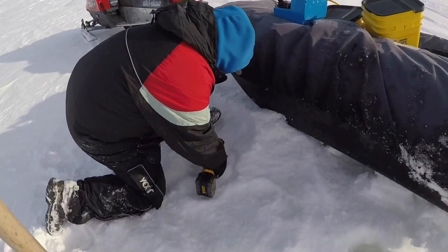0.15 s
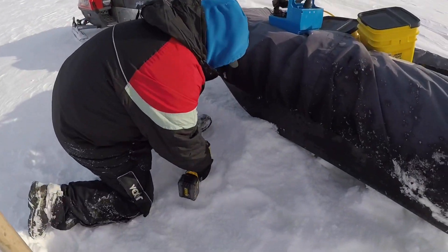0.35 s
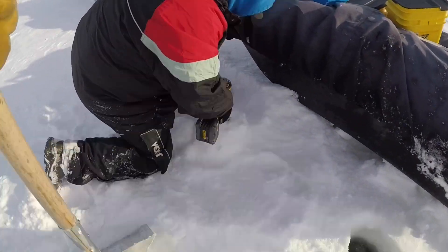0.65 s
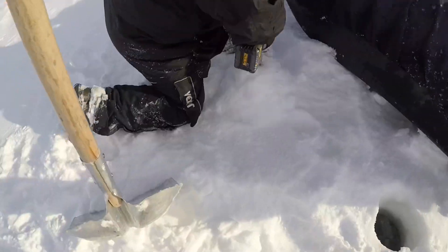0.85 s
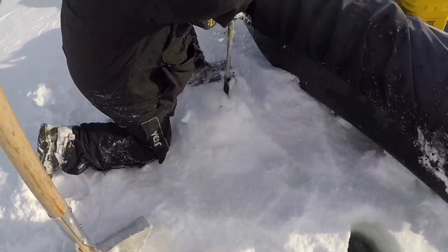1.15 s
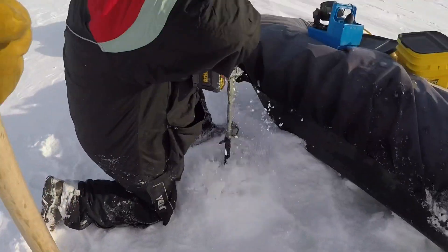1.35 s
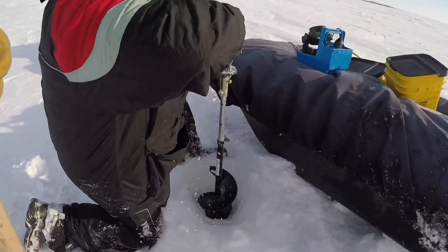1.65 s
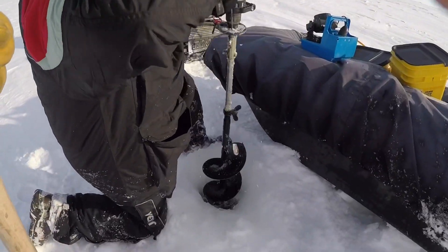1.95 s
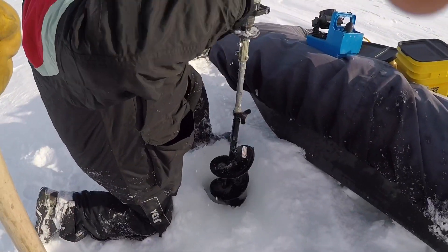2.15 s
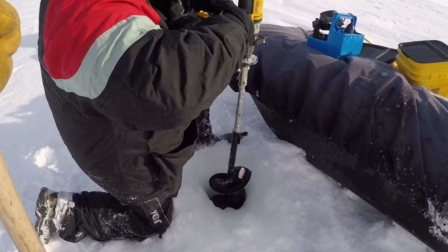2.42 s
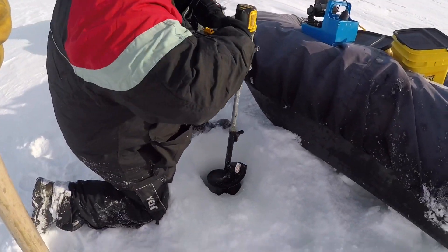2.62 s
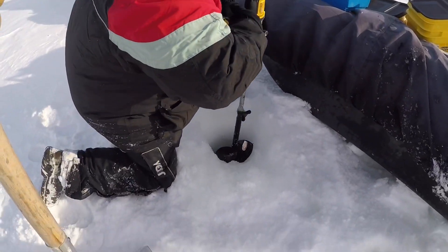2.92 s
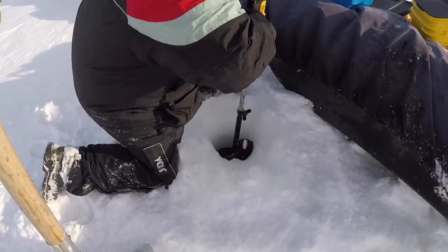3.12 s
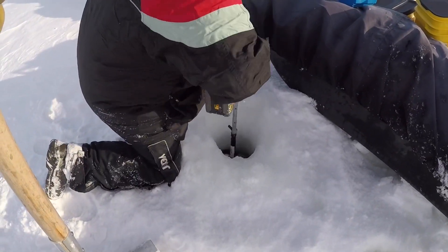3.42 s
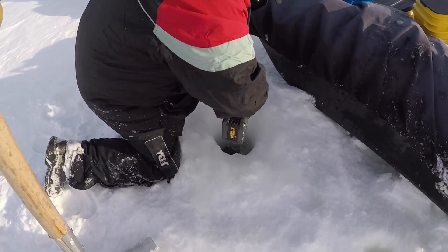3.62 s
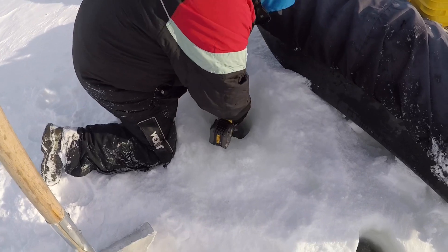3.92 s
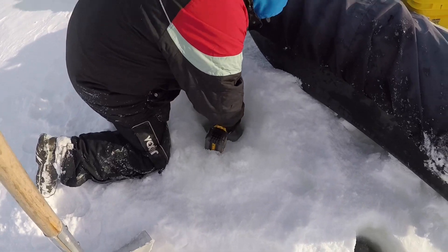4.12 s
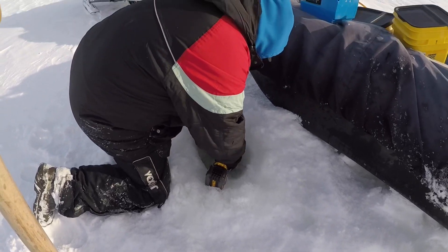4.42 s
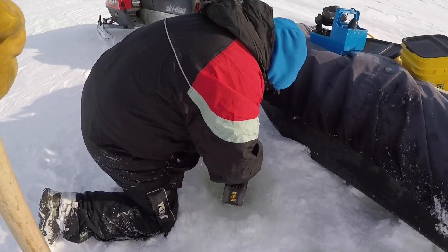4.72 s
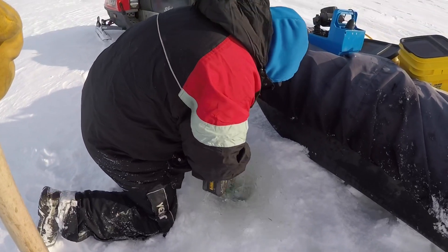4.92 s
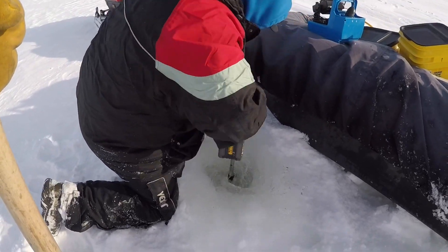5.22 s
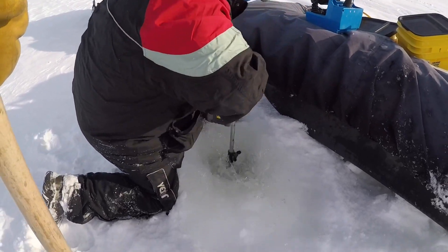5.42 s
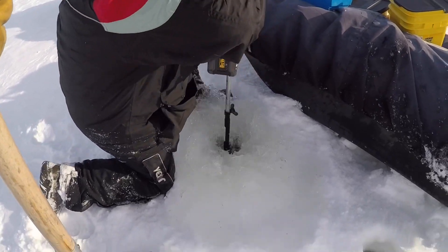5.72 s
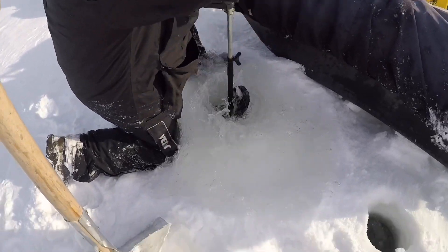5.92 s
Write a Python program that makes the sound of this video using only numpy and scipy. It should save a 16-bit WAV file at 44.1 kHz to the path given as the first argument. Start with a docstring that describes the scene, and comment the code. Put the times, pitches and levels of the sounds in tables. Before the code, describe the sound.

Wind thumps and rumbles on a small camera microphone out on lake ice. A cordless drill whines twice, spinning an auger, then rests while ice scrapes, snow crunches and the trigger clicks. The motor starts again for its longest run, with low glugs of slush in the hole, and finishes with three short, hissy spurts over wet churning and grinding.

```python
"""A cordless drill spins an ice auger in six bursts, out on a windy frozen lake.
The motor whines on its shaft orders over a hiss of cooling air and scraped ice. Slush glugs in the
hole; snow crunches and the trigger clicks, mostly between the bursts. Heard through the microphone
of a small camera, with the wind buffeting it."""
import sys
import numpy as np
from scipy import signal
from scipy.fft import rfft, irfft, next_fast_len
from scipy.io import wavfile
from scipy.ndimage import uniform_filter1d, map_coordinates

SR = 44100
rng = np.random.default_rng(int(sys.argv[2]) if len(sys.argv) > 2 else 0)


def wrap_up_sound(samples):
    """Save the sound to the file named by the first command line argument, as 16-bit audio."""
    columns = np.atleast_2d(samples).T
    # keep every value between -1 and 1, then stretch to whole-number steps
    tamed = np.clip(columns, -1, 1)
    steps = np.round(tamed * 32767).astype(np.int16)
    wavfile.write(sys.argv[1], SR, steps)


N = 267157
STEP = 32  # samples between control values

# bright hiss of air, ice and snow: (frequency [Hz], spectral level [dB])
HISS_SPECTRUM = [(1180, 0.5), (2000, -4), (2730, -5), (3080, 1.5), (3400, -2.5), (4170, 6.5), (5600, 3),
                 (6250, 1), (7400, -11.5), (8540, -10.5), (13200, -38.5), (14000, -49), (15000, -92)]
# dull grind of ice and snow: (frequency [Hz], spectral level [dB])
GRIND_SPECTRUM = [(300, 0.5), (700, 2.5), (1200, -6), (2000, -12), (2700, -15.5), (3600, -48)]


def amp(db):
    return 10 ** (np.asarray(db) / 20)


def unit(x):
    return x / np.sqrt(np.mean(x ** 2) + 1e-20)


def curves(rows):
    """One value per sample for each column after the time."""
    times, *columns = np.transpose(rows)
    return [np.interp(np.arange(N) / SR, times, column) for column in columns]


def per_sample(control):
    """Control values spread out to one value per sample."""
    return np.interp(np.arange(N), np.arange(len(control)) * STEP, control)


def swells(rows):
    """One rounded rise and fall in control values for each row of (middle [s], length [s])."""
    t = np.arange(0, N, STEP) / SR
    spans = np.array([(t - middle) / length for middle, length, *_ in rows])
    return (.83 * np.cos(np.pi * np.clip(spans, -.5, .5))) ** 2


def wobble(rate):
    """A smooth random curve of rms 1, rate knots a second."""
    knots = rng.standard_normal(int(N * rate / SR) + 4)
    return unit(map_coordinates(knots, [np.arange(N) * rate / SR]))


def filtered(x, response):
    """x shaped by a gain that depends on frequency."""
    size = next_fast_len(N + 8192)
    return irfft(rfft(x, size) * response(np.fft.rfftfreq(size, 1 / SR)), size)[..., :N]


def noise(spectrum, patchy_db):
    """Coloured noise of rms 1 with patches of random gain in time and frequency."""
    cells = signal.stft(rng.standard_normal(N), nperseg=512)[2]
    patches = uniform_filter1d(rng.standard_normal(cells.shape), size=5, axis=0)
    patches = uniform_filter1d(patches, size=6, axis=1)
    patchy = signal.istft(cells * amp(patchy_db * unit(patches)), nperseg=512)[1][:N]
    knots_hz, db = np.transpose(spectrum)
    return unit(filtered(patchy, lambda hz: amp(np.interp(np.log(hz + 1), np.log(knots_hz + 1), db))))


def fuzzy_tone(phase, width_hz, steady):
    """A tone of rms 1 whose strength and phase partly wander at random."""
    return unit((steady + wobble(width_hz)) * np.cos(phase) + wobble(width_hz) * np.sin(phase))


def wind():
    """Eddies hit the microphone port in lumps; the hardest are single buffets."""
    # wind on the microphone: (time [s], level [dB])
    gusts = [(0, -18), (.28, -24), (.5, -23.5), (.8, -17.5), (1.2, -21.5), (1.42, -23), (1.7, -21.5),
             (1.95, -23), (2.3, -19), (2.8, -19.5), (3.2, -21.5), (3.7, -24), (4.03, -18), (4.4, -23.5),
             (4.6, -18), (4.82, -27), (5.05, -18), (5.35, -19), (5.6, -17), (6.06, -20.5)]
    # hard eddies: (middle [s], length [s], level [dB])
    eddies = [(0.016, 0.13, -11), (0.104, 0.034, -11), (0.144, 0.023, -9), (0.211, 0.09, -10),
              (.575, 0.048, -11.5), (0.736, 0.17, -18), (0.938, 0.15, -13), (1.072, 0.16, -14),
              (1.178, 0.06, -17), (1.53, 0.16, -18), (1.745, 0.052, -10), (1.828, .1, -19),
              (2.276, 0.12, -20), (2.74, 0.084, -26), (3.084, 0.11, -18), (3.93, 0.17, -17),
              (4.095, .12, -19.5), (4.261, 0.066, -16), (4.62, 0.076, -21), (4.933, 0.094, -18),
              (5.173, 0.075, -20), (5.41, 0.15, -14), (5.71, 0.11, -16), (5.95, 0.051, -17)]
    # rumble at the port: (frequency [Hz], spectral level [dB])
    rumble = [(15, -26), (30, 0.5), (60, 0), (110, -3), (200, -10.5), (500, -32.5), (1200, -68.5)]
    buffets = per_sample((swells(eddies) * amp(np.transpose(eddies)[2, :, None])).sum(0))
    flutter = amp(1.36 * wobble(7.1) + 1.4 * wobble(30))
    return (amp(curves(gusts)[0]) + buffets) * unit(flutter * noise(rumble, patchy_db=.5))


def crunches_and_clicks():
    """Each crunch or trigger click is a crackle over a duller thud, with a brief ring of steel."""
    # crunches of snow and ice, and clicks of the drill's trigger:
    # (time [s], level [dB], thud offset [dB], t60 [s])
    hits = [(.958, -25, -7, 0.046), (1.012, -27, -8, 0.036), (1.073, -14, -13, 0.045),
            (1.092, -10, -12, 0.046), (1.11, -14, -13, 0.076), (1.513, -11, 12.5, 0.034),
            (1.6327, -21.5, 8.5, 0.16), (1.7055, -18.5, -3, 0.089), (1.7174, -38, 13, 0.028),
            (1.8906, -19, -11, 0.048), (2.0882, -18, -16, 0.082), (2.286, -14, -2, 0.067),
            (2.405, -7.5, 12, 0.028), (2.457, -15, -4, 0.15), (2.5216, -7.5, -7, 0.037),
            (2.616, -3, -3, 0.035), (2.713, -12, -19, 0.055), (2.7427, -11, -15, 0.054),
            (2.7644, -38, 0, 0.032), (2.879, -21, 2, 0.044), (2.9407, -13, -11, 0.052),
            (2.9824, -42, 0, 0.066), (3.099, -19, -9, 0.032), (3.272, -18, 10.5, 0.051),
            (3.5654, -2, -17, 0.032), (4.884, -11, -8, 0.049), (4.9177, -27, 7, 0.035),
            (4.966, -17, 3, 0.094), (5.037, -11, -5, .03), (5.5994, -21, 3, 0.034), (5.7364, -27, 2, 0.055)]
    # modes of the auger's steel flight: (frequency [Hz], level [dB], t60 [s])
    steel_modes = [(853, 6.5, 0.034), (1166, -4, 0.045), (1710, 3, 0.029), (2300, -14, .025),
                   (3730, -3, 0.01), (4500, 7, 0.013), (5600, -21, .015), (7000, -11, 0.024)]
    t = np.arange(SR // 4) / SR
    crackle_gain, thud_gain, steel = np.zeros((3, N + SR))
    for start, db, thud_db, t60 in hits:
        at = slice(round(start * SR), round(start * SR) + len(t))
        envelope = amp(db - 60 * t / t60) * (1 - np.exp(-t / .0012))
        crackle_gain[at] += envelope
        thud_gain[at] += envelope * amp(thud_db)
        ring = sum(amp(db + level + rng.normal(0, 3.4) - 60 * t / ring_t60) * np.sin(2 * np.pi * hz * t)
                   for hz, level, ring_t60 in steel_modes)
        steel[at] += (1 - np.exp(-t / .0018)) * ring
    crackle = crackle_gain[:N] * noise(HISS_SPECTRUM, patchy_db=7.5)
    crackle = filtered(crackle, lambda hz: 1 / (1 + (hz / 9500) ** 6))
    thud = thud_gain[:N] * noise(GRIND_SPECTRUM, patchy_db=-9.5)
    return amp(-12.5) * crackle + amp(-9) * thud + amp(-16.5) * steel[:N]


def heave():
    """Slush heaves in the hole, setting the strength of the churning and the hole's note in Hz."""
    # surges of slush: (middle [s], length [s], level [dB], hole note [Hz])
    surges = [(0, 0.14, -9.5, 199), (0.184, 0.18, -12.5, 200), (0.572, 0.095, -16.5, 236),
              (0.742, 0.25, -15, 235), (0.96, 0.36, -22.5, 217), (1.091, 0.32, -25, 193),
              (1.392, 0.44, -14, 329), (1.576, 0.17, -13, 366), (1.705, 0.19, -14.5, 355),
              (1.812, 0.13, -18.5, 221), (2.19, 0.5, -22, 196), (2.605, 0.28, -28, 217),
              (2.764, 0.18, -21.5, 228), (2.955, 0.15, -19, 285), (3.132, 0.31, -18.5, 222),
              (3.473, 0.35, -11.5, 245), (3.595, 0.14, -12, 195), (3.73, 0.24, -12, 218.5),
              (3.907, 0.33, -21, 240), (4.38, 0.57, -26, 214), (5.011, 0.15, -20, 325),
              (5.183, 0.66, -22, 300), (5.44, 0.15, -15, 248), (5.552, 0.27, -14, 378),
              (5.696, 0.21, -10, 324), (5.828, 0.27, -9.5, 279), (5.987, 0.31, -12, 346)]
    rest_gain, rest_hz = amp(-42.5), 179.8
    _, _, db, hz = np.transpose(surges)[:, :, None]
    gains = swells(surges) * amp(db)
    strength = gains.sum(0) + rest_gain
    hole_hz = ((gains * hz).sum(0) + rest_gain * rest_hz) / strength
    return per_sample(strength), per_sample(hole_hz)


def slush(count=3000):
    """Lumps of slush set the air in the hole ringing for a few cycles, mostly above its note."""
    strength, hole_hz = heave()
    starts, age = (rng.random(count) * N).astype(int), np.arange(SR // 30)
    pitch, size = rng.exponential(size=(2, count))
    lump_hz = hole_hz[starts] * np.exp(np.minimum(.4 * pitch, 1.1) - .15)
    cycles = lump_hz[:, None] * age / SR
    envelope = np.exp(-cycles / 2.12) * (1 - np.exp(-cycles / 1.07)) * np.cos(np.pi / 2 * age / len(age))
    lumps = amp(2.3 * size - .7 * pitch)[:, None] * envelope * np.sin(2 * np.pi * cycles)
    churn = np.bincount((starts[:, None] + age).ravel(), lumps.ravel(), N + SR)[:N]
    return strength * unit(amp(2 * wobble(22)) * churn)


def glugs(t60_s=.057):
    """The largest lumps glug: the pitch rises as the air pocket shrinks."""
    # air pockets: (time [s], level [dB], starting pitch [Hz])
    pockets = [(.133, -7, 144), (0.217, 3, 178), (0.561, -17, 280), (.716, -2, 241), (0.771, 7, 151),
               (0.95, 0.5, 230), (1.333, -5, 342), (1.379, 4, 330), (1.414, 6.5, 311), (1.444, 5.5, 335),
               (1.525, -5, 201), (1.544, 1, 440), (1.636, 5, 349), (1.715, 0, 427), (1.818, -1, 220),
               (2.129, -10, 152), (2.983, -3.5, 181), (3.177, 0.5, 184), (3.275, 1, 232), (3.395, 6.5, 226),
               (3.561, 9.5, 173.5), (3.685, 8.5, 190), (3.746, 7, 201), (3.863, 0, 243), (3.904, 2, 277.4),
               (4.995, -3.5, 501), (5.231, -3.5, 427), (5.351, -2.5, 254), (5.407, -3.5, 368),
               (5.666, 3.5, 290), (5.701, 2, 468), (5.794, 5, 294), (5.86, -9, 316), (5.924, 0, 274)]
    # modes of the air in the hole: (pitch ratio, level [dB])
    hole_modes = [(0.999, -1), (1.7, -6), (2.4, -12.5), (3.2, -14)]
    out, t = np.zeros(N + SR), np.arange(SR // 4) / SR
    for start, db, hz in pockets:
        envelope = amp(db - 60 * t / t60_s) * (1 - np.exp(-t / .006))
        phase = 2 * np.pi * hz * t * (1 + 1.44 * t)
        ring = sum(amp(level - 60 * t * (ratio - 1) / .059) * np.sin(ratio * phase)
                   for ratio, level in hole_modes)
        out[round(start * SR):][:len(t)] += envelope * ring
    return out[:N]


def trigger():
    """Each pull runs up, holds and coasts down: speed 0-1 and the gains of air, gears and octave."""
    # trigger pulls: (start [s], stop [s], coast-down [s], air hiss [dB], gear mesh [dB], octave [dB])
    pulls = [(-.3, 0.881, .16, -26, -32.5, -30), (1.145, 1.418, .16, -25, -46, -32.5),
             (3.257, 4.808, .14, -28, -39.5, -35.5), (5.03, 5.318, .14, -27, -34, -32),
             (5.442, 5.65, .6, -27, -32.5, -33), (5.865, 6.203, .2, -32.5, -40, -52)]
    spin_up_s, air_lead_s, air_rise_s, air_fall_s = .037, .0071, .066, .043
    t = np.arange(0, N, STEP) / SR
    start, stop, coast, air_db, mesh_db, octave_db = np.transpose(pulls)[:, :, None]
    since = np.maximum(t - start, 0)
    speeds = (1 - np.exp(-since / spin_up_s)) * np.clip(1 - (t - stop) / coast, 0, 1)
    inrush_db = 2 * np.exp(-since / .12)  # the hiss is strongest just after the pull
    air = np.clip((t - start + air_lead_s) / air_rise_s, 0, 1) * amp(air_db + inrush_db)
    air *= np.exp(-np.maximum(t - stop, 0) / air_fall_s)
    active = speeds.argmax(0)
    controls = speeds.max(0), air.sum(0), amp(mesh_db[active, 0]), amp(octave_db[active, 0])
    return [per_sample(control) for control in controls]


def air_and_scrape():
    """Cooling air and scraped ice hiss, ice and slush grind; all flutter as chips pass the blade."""
    # the auger drags on ice and snow: (middle [s], length [s], hiss [dB], grind [dB])
    scuffs = [(0.952, 0.059, -42, -41), (1.138, .08, -22, -48), (1.287, 0.14, -52, -22),
              (1.394, 0.18, -58, -17.5), (1.536, 0.13, -36.5, -16.5), (1.67, 0.2, -41, -40),
              (1.937, 0.47, -42, -42), (2.292, 0.059, -41, -30), (2.419, 0.21, -33, -28.5),
              (2.548, 0.16, -32, -26.5), (2.625, .04, -33, -23), (2.676, 0.12, -38, -37.5),
              (2.763, 0.092, -26.5, -20.5), (2.956, 0.19, -41.5, -26), (3.107, 0.053, -69, -50),
              (3.281, 0.12, -49, -27), (3.387, 0.22, -30, -16), (3.502, .08, -52, -16),
              (3.577, 0.062, -57, -29), (3.731, 0.062, -38.5, -32), (4.594, 0.29, -32, -38),
              (4.805, 0.45, -61, -29), (4.93, 0.085, -52, -44), (5.093, 0.22, -29, -23.5),
              (5.293, 0.31, -58, -25.5), (5.395, 0.25, -39, -35), (5.597, 0.11, -60, -19),
              (5.72, 0.32, -40, -39), (5.809, 0.19, -28, -27), (5.954, 0.22, -34.5, -21.5)]
    rest_hiss_db, rest_grind_db = -46.5, -37.5
    _, _, hiss_db, grind_db = np.transpose(scuffs)[:, :, None]
    drags, cooling_air, slush_grind = swells(scuffs), trigger()[1], amp(-22.5) * heave()[0]
    hiss = per_sample((drags * amp(hiss_db)).sum(0)) + amp(rest_hiss_db) + cooling_air
    grind = per_sample((drags * amp(grind_db)).sum(0)) + amp(rest_grind_db) + slush_grind
    chips = .5 * wobble(12) + .9 * wobble(65) + .74 * wobble(300)
    return (hiss * amp(1.28 * chips) * noise(HISS_SPECTRUM, patchy_db=1.5)
            + grind * amp(1.56 * chips) * noise(GRIND_SPECTRUM, patchy_db=5))


def drill_motor():
    """Commutator whine, gear and shaft tones follow the speed; they and the brushes fade as it falls."""
    # balance of the motor: (time [s], whine [dB], half-order growl [dB], brush sizzle [dB])
    levels = [(0, -42, -47, -39), (.22, -46, -38, -39.5), (.42, -35, -34.5, -37.5), (.58, -43, -44, -37),
              (.65, -29.5, -43, -38.5), (.88, -33, -44, -42), (.94, -39, -26, -56), (1.16, -45, -38, -67),
              (1.22, -23, -38, -68), (1.3, -40, -41, -71), (1.45, -41, -32, -66), (3.3, -50, -32, -60),
              (3.6, -42, -44, -58), (4.02, -24, -43.5, -42.5), (4.1, -24, -38, -45), (4.2, -24.5, -46, -69),
              (4.45, -21.5, -45, -69), (4.6, -36.5, -37, -67), (4.78, -32.5, -30.5, -71),
              (4.83, -25, -34, -65), (4.88, -42, -33, -70), (5.1, -27, -46, -46), (5.2, -44, -32, -42.5),
              (5.32, -31, -37, -39.5), (5.57, -40, -37, -40.5), (5.65, -32.5, -30.5, -47),
              (5.8, -42, -34, -46), (6.06, -33, -33, -51)]
    # brush sizzle: (frequency [Hz], spectral level [dB])
    sizzle_spectrum = [(6650, -65), (11300, -2), (11500, -22), (11900, 1), (12500, 9.5), (12800, 5),
                       (14000, 0), (15000, -6)]
    full_speed_hz, casing_hz, bite_hz, mesh_ratio = 3105, 3150, 14, .605
    speed, _, mesh_gain, octave_gain = trigger()
    whine_db, growl_db, sizzle_db = curves(levels)
    running = amp(24 * (speed - 1)) * np.clip(3 * speed - 1, 0, 1)
    whine_hz = full_speed_hz * speed * (1 + .007 * wobble(20))  # the load wanders
    bites = np.sin(2 * np.pi * np.cumsum(bite_hz + 2.5 * wobble(5)) / SR)
    shake = .017 * bites + .011 * wobble(55)  # each bite of the blades shakes the speed
    phase = 2 * np.pi * np.cumsum(whine_hz * (1 + shake)) / SR
    # the heavy gear train evens the speed
    even_phase = 2 * np.pi * np.cumsum(uniform_filter1d(whine_hz, size=1500)) / SR
    whine = amp(whine_db + 2.7 * wobble(18)) * fuzzy_tone(phase, width_hz=71, steady=3.5)
    gears = running * mesh_gain * amp(3 * bites + wobble(10) + 3 * wobble(60))
    gears *= fuzzy_tone(mesh_ratio * (even_phase + phase) / 2, width_hz=150, steady=.7)
    octave = octave_gain * fuzzy_tone(2 * phase, width_hz=420, steady=.5)
    growl = fuzzy_tone(phase / 2, width_hz=70, steady=1.4)
    # with the whine at casing_hz, near full speed, its octave meets a resonance of the casing
    casing_db = -np.abs(whine_hz - casing_hz) / 200
    octave *= amp(.21 * (whine_db - whine_db.mean()) + 3.6 * wobble(35) + casing_db)
    growl *= amp(growl_db + 1.9 * wobble(25))
    shaft = amp(-5) * mesh_gain * np.cos(even_phase / 8)
    sizzle = amp(1.8 * wobble(40)) * noise(sizzle_spectrum, patchy_db=2.5)
    stereo_fizz = amp(-9) * noise(sizzle_spectrum, patchy_db=1) * [[1], [-1]]
    return running * (whine + gears + octave + growl + shaft + amp(sizzle_db) * (sizzle + stereo_fizz))


def scene():
    """Everything sits in the centre; a faint high fizz differs between left and right."""
    return drill_motor() + air_and_scrape() + crunches_and_clicks() + slush() + glugs() + wind()


def record(dry):
    """The camera's input rounds off the tallest peaks and keeps nothing above its band limit."""
    rounded = dry / (1 + np.abs(dry / 1.1) ** 4) ** (1 / 4)
    return filtered(rounded, lambda hz: hz < 15230)


dry = scene()
out = record(dry)
wrap_up_sound(out)
```